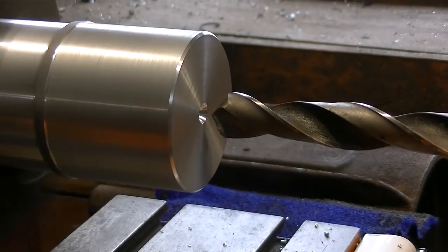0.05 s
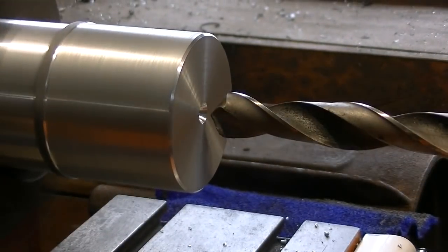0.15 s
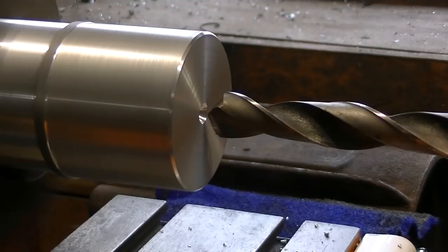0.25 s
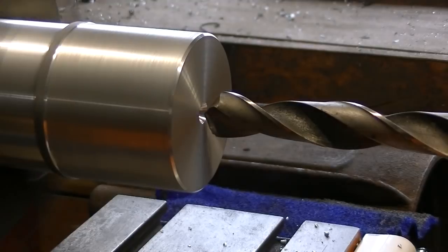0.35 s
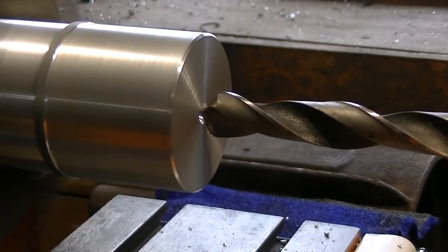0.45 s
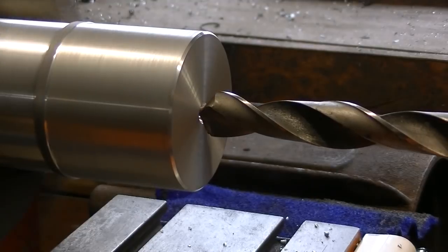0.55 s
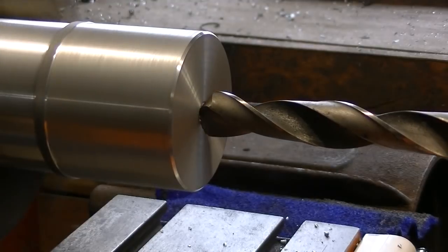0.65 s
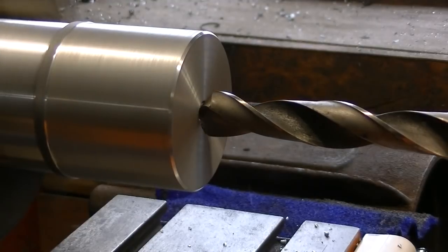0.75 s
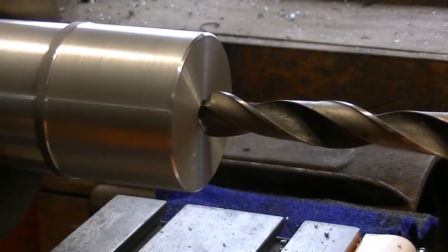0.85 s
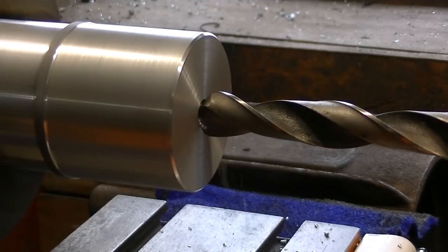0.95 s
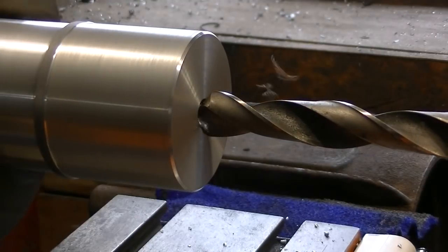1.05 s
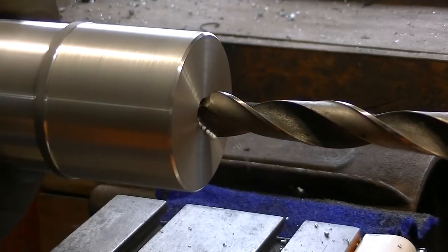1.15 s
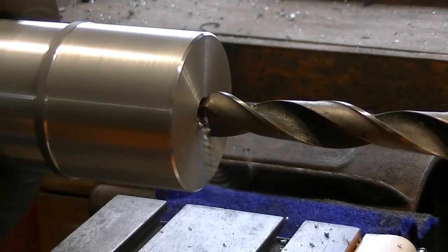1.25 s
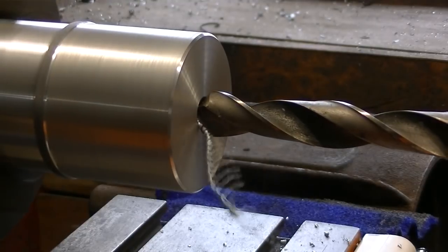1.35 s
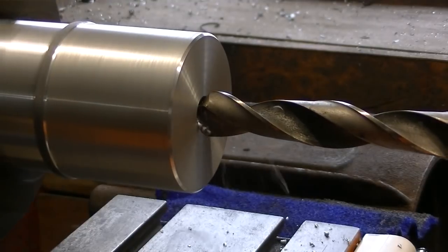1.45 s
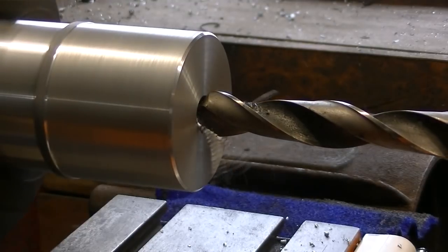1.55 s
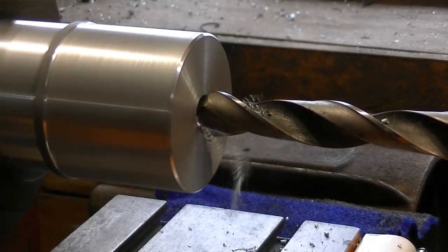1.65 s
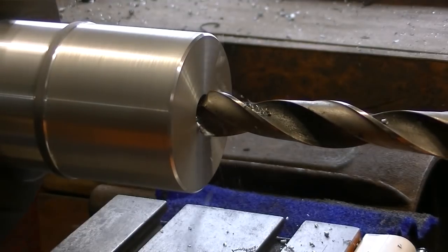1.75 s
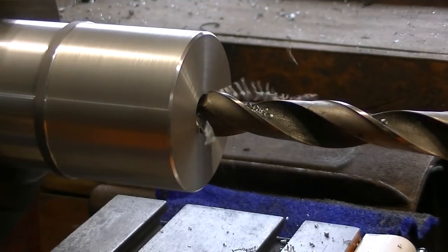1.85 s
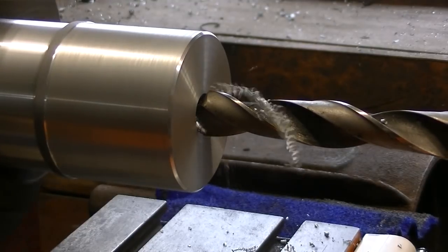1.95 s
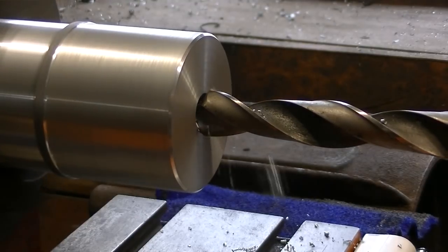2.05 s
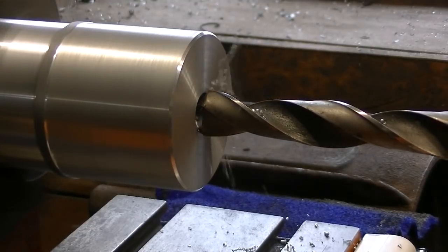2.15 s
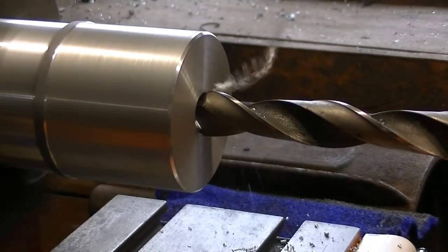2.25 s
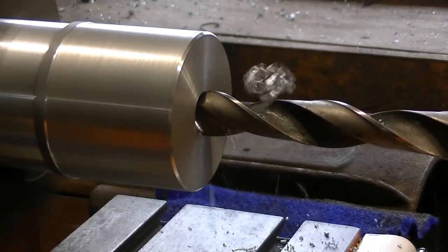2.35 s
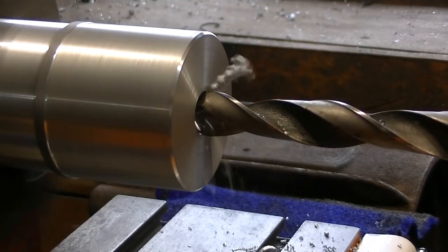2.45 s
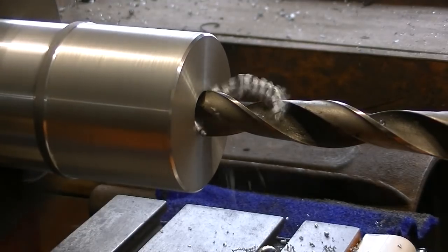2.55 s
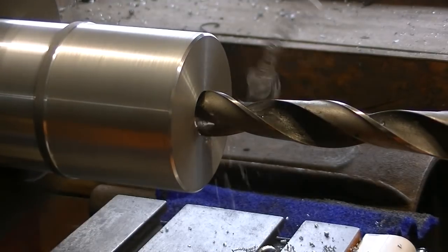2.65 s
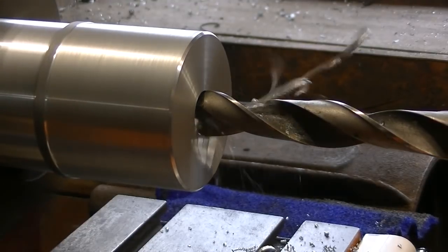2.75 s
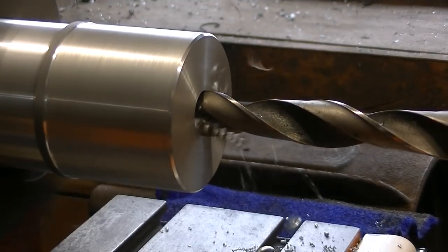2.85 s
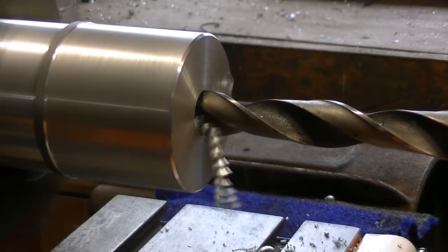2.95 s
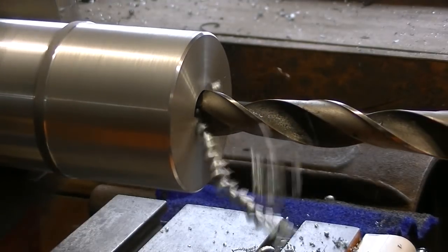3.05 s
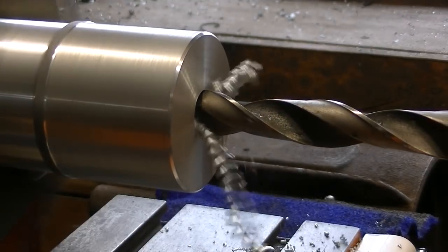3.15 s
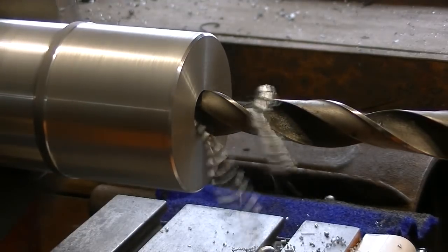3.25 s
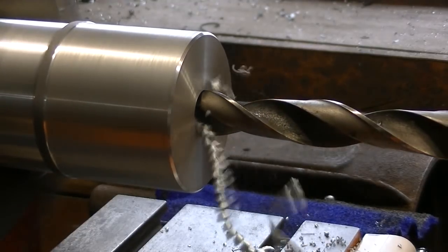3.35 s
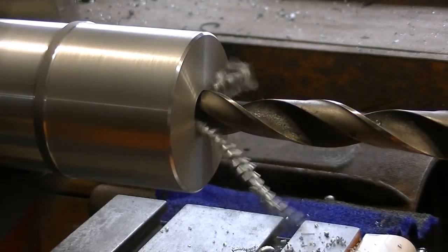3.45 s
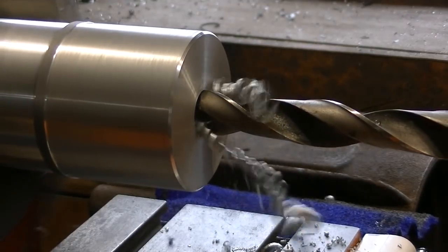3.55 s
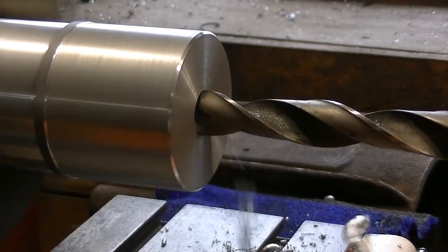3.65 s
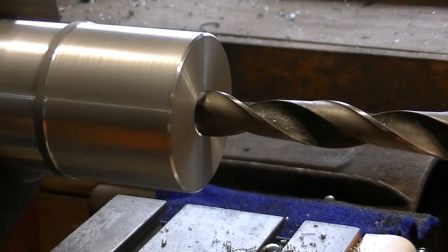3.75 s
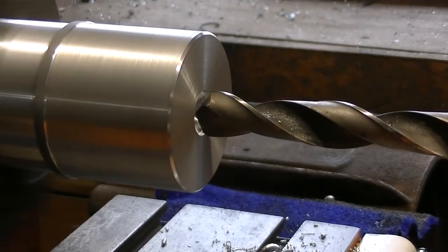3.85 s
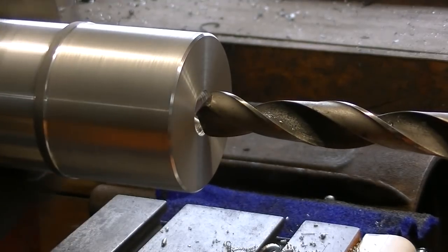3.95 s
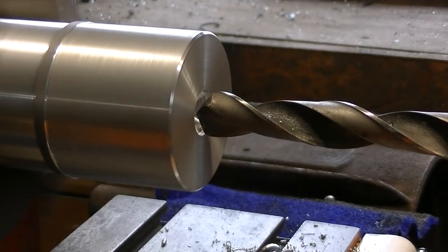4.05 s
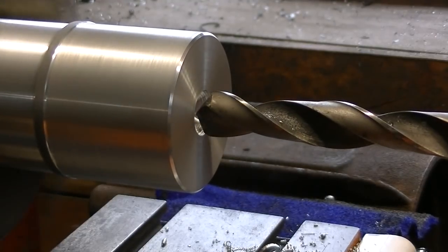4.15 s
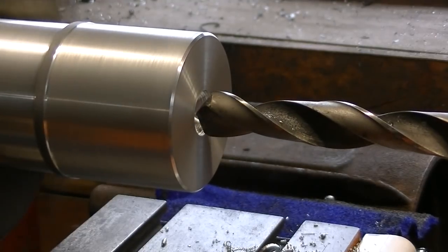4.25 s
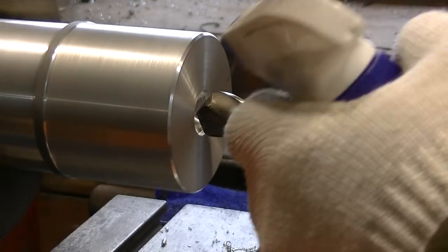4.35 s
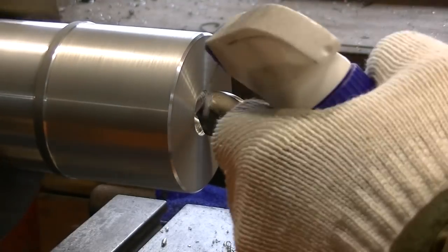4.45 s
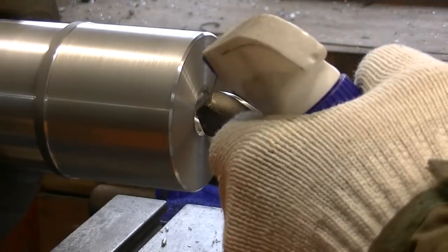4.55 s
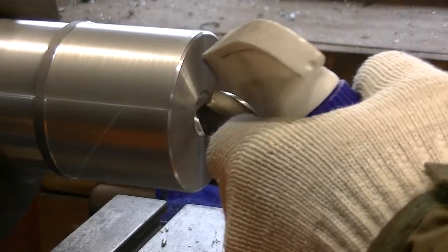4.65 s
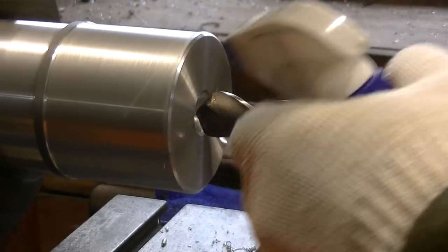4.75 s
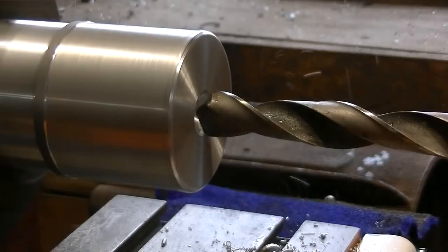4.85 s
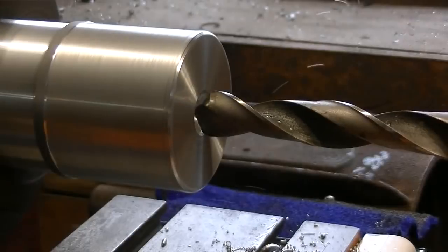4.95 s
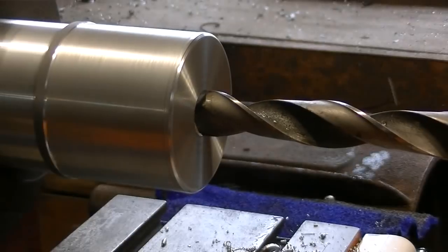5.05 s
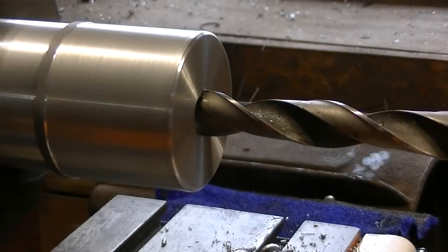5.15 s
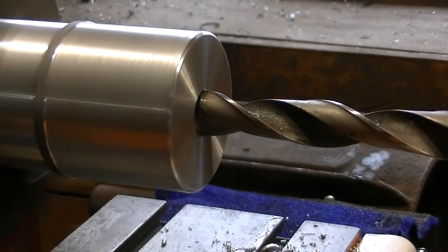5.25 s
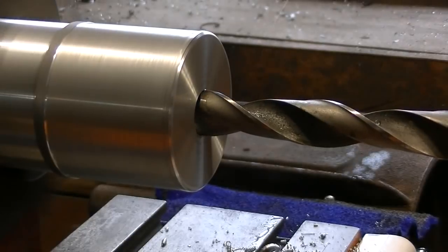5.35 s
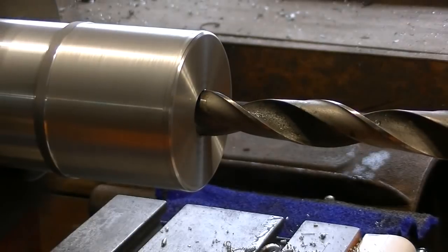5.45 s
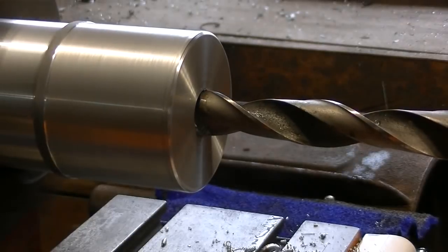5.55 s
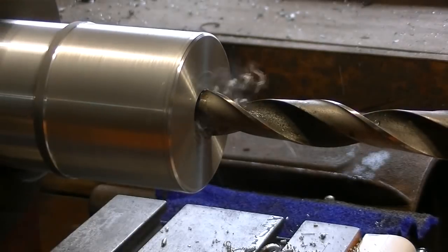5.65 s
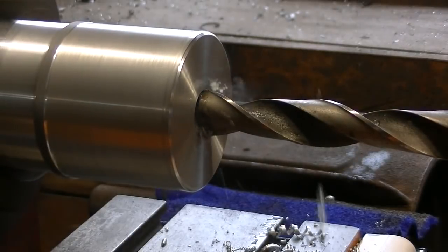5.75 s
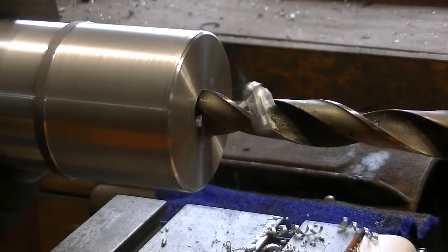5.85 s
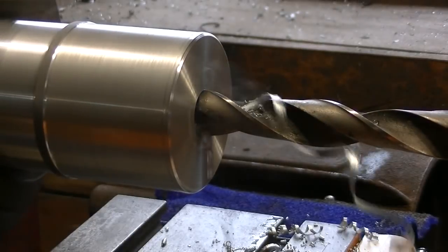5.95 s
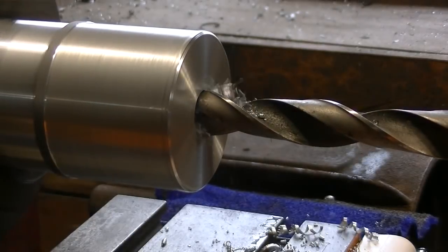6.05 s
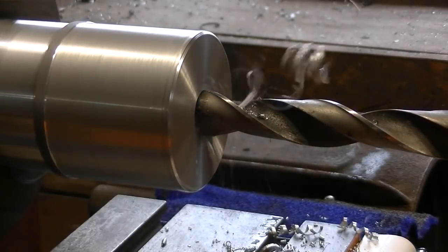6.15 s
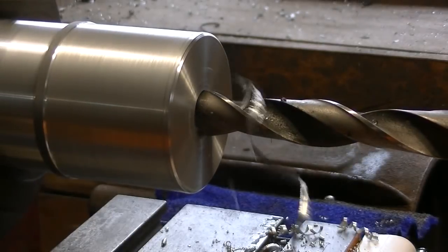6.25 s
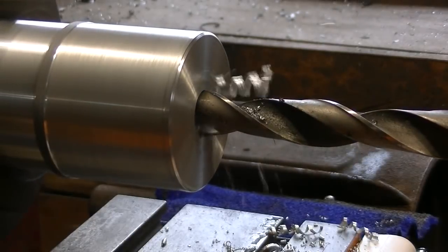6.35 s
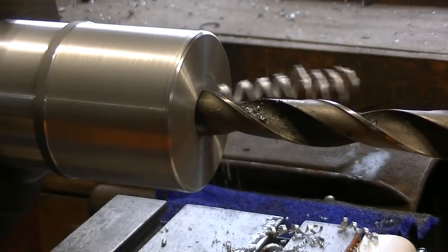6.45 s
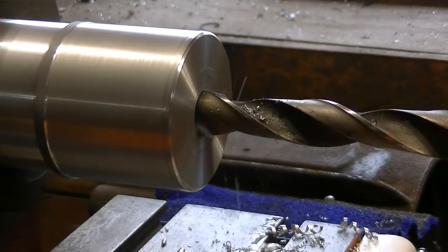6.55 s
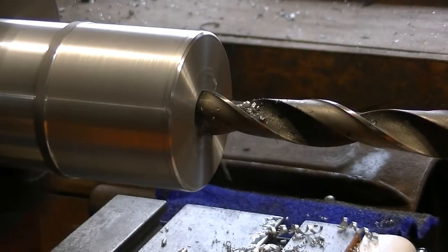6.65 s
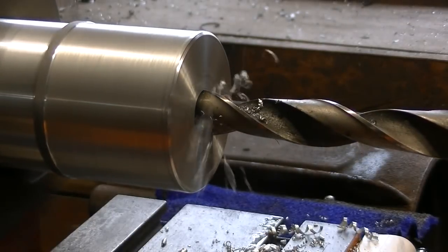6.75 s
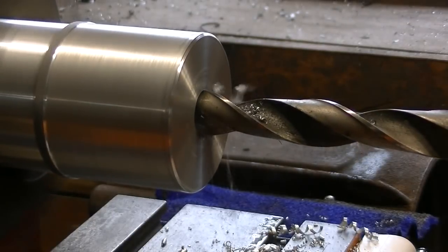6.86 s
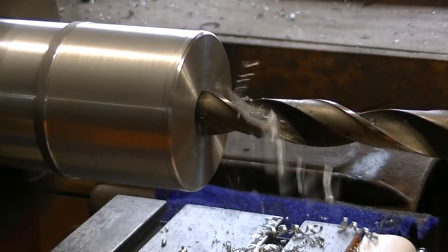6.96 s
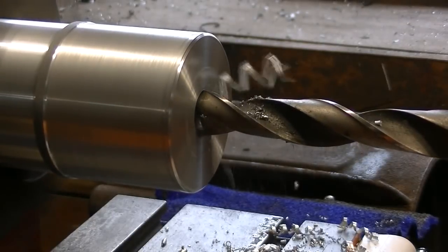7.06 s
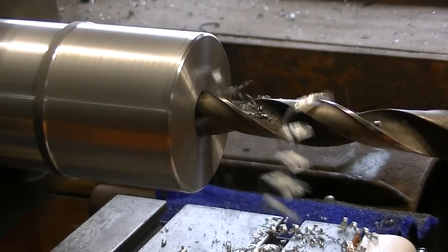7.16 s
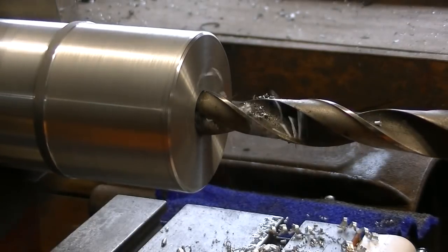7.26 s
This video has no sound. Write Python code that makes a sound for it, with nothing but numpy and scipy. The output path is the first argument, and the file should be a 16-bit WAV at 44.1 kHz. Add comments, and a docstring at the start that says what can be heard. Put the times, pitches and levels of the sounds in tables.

```python
"""In a small workshop, a large twist drill is fed into an aluminium block spinning on a lathe, backed
out briefly, and fed in again. The gears whine and the bearings hiss. The drill's cutting edges crunch
through the metal, chips groan, and short rasps come and go. The drill shakes (chatters) in a high squeal
that throbs with every turn. Near the end the whole sound sinks, with one brief swell. It is thin and
nearly mono, and a limiter turns the lathe down under the loud squeal."""
import sys
import numpy as np
from scipy import signal
from scipy.fft import rfft, irfft, next_fast_len
from scipy.io import wavfile
from scipy.ndimage import uniform_filter1d, minimum_filter1d, map_coordinates

SR = 44100
rng = np.random.default_rng(int(sys.argv[2]) if len(sys.argv) > 2 else 0)


def transcribe(u):
    """Save the signal u as a 16-bit wav file named by the first command-line argument.

    u: samples, shape (n,) or (channels, n), limited to [-1, 1]; the rate is SR.
    q: integer samples, one column per channel.
    """
    v = np.clip(np.atleast_2d(u).T, -1, 1)
    q = np.round(v * 32767).astype(np.int16)
    wavfile.write(sys.argv[1], SR, q)


N = 322371
TIME = np.arange(N) / SR
TEETH, IDLE_HZ = 71, 2365  # teeth on the gear; teeth meeting each second when idling
BITE_S, FREE_S = 0.022, 0.028  # how fast the drill bites and lets go


def amp(db):
    """Turn decibels into a gain."""
    return 10 ** (np.asarray(db) / 20)


def unit(x):
    """Scale to an average (rms) level of 1."""
    return x / np.sqrt(np.mean(np.abs(x) ** 2) + 1e-20)


def along(points, hz):
    """Read between (Hz, value) points on a log frequency axis."""
    point_hz, values = np.transpose(points)
    return np.interp(np.log(hz + 1), np.log(point_hz + 1), values)


def held(start, end, attack_s=BITE_S, release_s=FREE_S):
    """A level that rises from start, holds, and dies away after end."""
    rise = np.clip((TIME - start) / attack_s, 0, 1)
    return rise * np.exp(-np.maximum(TIME - end, 0) / release_s)


def wobble(rate):
    """A smooth random curve with rate new values a second."""
    coarse = np.arange(0, N + 8, 8)
    knots = rng.standard_normal(int(N * rate / SR) + 4)
    return np.interp(np.arange(N), coarse, map_coordinates(knots, [coarse * rate / SR]))


def phase(hz):
    """The running angle of a changing frequency."""
    return 2 * np.pi * np.cumsum(hz) / SR


def filtered(x, response):
    """Give each frequency in x the gain response(Hz)."""
    size = next_fast_len(N + 8192)
    return irfft(rfft(x, size) * response(np.fft.rfftfreq(size, 1 / SR)), size)[..., :N]


def coloured(x, spectrum, resonances=()):
    """Shape x with a smooth tone colour and ringing peaks, at level 1."""
    def response(f):
        peaks_db = sum(db / (1 + (2 * (f - hz) / width) ** 2) for hz, width, db in resonances)
        return amp(along(spectrum, f) + peaks_db)
    return unit(filtered(x, response))


def grit(spread_db, rate):
    """Grainy noise whose strength jumps rate times a second."""
    return rng.standard_normal(N) * amp(spread_db * wobble(rate))


# Each row: time in seconds, gear teeth meeting per second.
SPINDLE_SPEED = [(0, 2361), (0.4, 2371), (1.3, 2369), (1.7, 2369), (2.0, 2375), (3.58, 2373), (3.69, 2428),
                 (4.0, 2391), (4.35, 2368), (5.35, 2368), (5.55, 2354), (5.8, 2366), (6.45, 2376),
                 (6.6, 2388), (6.9, 2360), (7.31, 2382)]

def spindle():
    """The turning shaft overshoots as the drill backs out. Gives its angle and the tooth rate."""
    tooth_hz = np.interp(TIME, *np.transpose(SPINDLE_SPEED))
    return phase(tooth_hz / TEETH), tooth_hz


# The drive's quieter tones. Each row: pitch at idle in Hz, level in dB.
GEAR_TONES = [(624.5, -75), (802.1, -74), (866.7, -75), (1093, -62), (1163, -59.5), (1200, -62),
              (1244, -57), (1303, -54), (1389, -56.5), (1599, -66.5), (1707, -60.5)]

def gears(turn, tooth_hz, slide, case_hz=2350.3, case_width_hz=23.2):
    """Meeting teeth whine, louder under load; an off-centre gear makes them swell once a turn."""
    load = np.minimum(slide / amp(-25), 1) ** 2  # 1 in a full cut
    swell = (1 + 0.5 * np.cos(turn + .2 * np.cos(turn))) * amp(.7 * wobble(40))
    slack = .1 * wobble(40)
    # loudest at the pitch where the gear case rings
    strength = amp(-30 + 2.5 * load) / (1 + ((tooth_hz - case_hz) / case_width_hz) ** 2)
    whine = strength * unit(swell * np.sin(TEETH * turn + 0.46 * np.sin(turn + 1.05) + slack))
    tones = 0
    for hz, db in GEAR_TONES:
        level = np.sqrt(2) * amp(db + 0.66 + 1.93 * wobble(9))
        tones += level * np.sin(phase(hz * tooth_hz / IDLE_HZ) + 0.26 * wobble(12))
    return (whine + tones) * np.minimum(TIME / 0.014, 1)


# The bearings' tone colour. Each row: frequency in Hz, level in dB.
BEARING_COLOUR = [(480, -50), (600, -36), (790, -22), (990, -27), (1150, -4.5), (1450, -3.5), (1620, -20),
                  (2150, -1.5), (3300, -1), (4500, 3), (6400, -2), (8000, 1), (11000, -3.5), (15500, -8.5)]
# Where their housing rings. Each row: pitch in Hz, width in Hz, boost in dB.
HOUSING_RINGS = [(1268, 190, 3.2), (2349, 37, 16.8), (4081, 62, 9.2), (4244, 41, 8.7), (4822, 65, 10.2),
                 (5066, 290, 9.1), (5860, 140, 4.4), (7330, 450, 5.7), (7670, 90, 2.7), (8830, 190, 5.4)]

def bearings(level_db=-30):
    """Rolling bearings hiss and make their housing ring."""
    level = amp(level_db + 0.37 * wobble(25))
    return level * coloured(grit(spread_db=1.5, rate=500), BEARING_COLOUR, HOUSING_RINGS)


# The background's tone colour. Each row: frequency in Hz, level in dB.
BACKGROUND_COLOUR = [(25, 0), (100, -6), (500, -0.5), (15000, -7.5)]

def background(level_db=-75):
    """A very faint, steady hiss."""
    return amp(level_db) * coloured(rng.standard_normal(N), BACKGROUND_COLOUR)


# The room's echo. Each row: frequency in Hz, seconds to fade by 60 dB.
ECHO_FADE = [(300, .22), (3000, 0.067), (13000, 0.27)]

def workshop(x, level_db=-16):
    """The walls give a short, bright echo, different left and right."""
    bright = filtered(x, lambda f: amp(along([(2000, -32.5), (5000, -9.0), (12000, -3)], f)))
    hz, t, noise = signal.stft(rng.standard_normal((2, SR // 4)), SR, nperseg=256)
    tail = signal.istft(noise * amp(-60 * t / along(ECHO_FADE, hz)[:, None]), SR, nperseg=256)[1]
    tail /= np.linalg.norm(tail[0])
    return amp(level_db) * signal.fftconvolve(bright[None], tail, axes=1)[:, :N]


# The drill on the metal, from a light graze to grooves packed with chips. Each row: start and end in
# seconds, crunch in dB, its change in dB a second, hiss in dB, its change in dB a second.
CONTACTS = [(0.01, 0.68, -39, -10, -37, -13), (0.68, 1.996, -31, 3, -30.5, 4),
            (2.021, 3.605, -30.5, -5, -25.5, 5.5), (5.175, 5.464, -35, -3, -38, 3),
            (5.461, 7.31, -34, -3, -25, -5), (5.75, 6.42, -63, -3, -27, -8)]
# The edges dig in harder. Each row: start and end in seconds, crunch in dB.
SNAGS = [(0.66, 0.695, -33), (0.986, 1.27, -32), (1.197, 1.275, -34), (3.655, 3.716, -32)]

def contact():
    """How hard the edges tear and the chips slide; both drift as the drill goes deeper."""
    tear = sum(amp(db) * held(start, end) for start, end, db in SNAGS)
    slide = 0
    for start, end, crunch_db, crunch_trend, hiss_db, hiss_trend in CONTACTS:
        touch, age = held(start, end), TIME - start
        tear += touch * amp(crunch_db + crunch_trend * age)
        slide += touch * amp(hiss_db + hiss_trend * age)
    return tear, slide


def patchy(x, depth_db):
    """The tone colour keeps shifting as the chips touch in new places."""
    bands = signal.stft(x, nperseg=512)[2]
    patches = uniform_filter1d(rng.standard_normal(bands.shape), 7, axis=0)  # smooth over pitch
    patches = uniform_filter1d(patches, 22, axis=1)  # and over time
    return unit(signal.istft(bands * amp(depth_db * unit(patches)), nperseg=512)[1][:N])


# Tone colours of tearing metal and sliding chips. Each row: frequency in Hz, level in dB.
CRUNCH_COLOUR = [(480, -62), (620, -45), (820, -9), (1000, -18.5), (1150, -17), (1400, 5.5), (1700, -5),
                 (2200, 6), (3000, -2.5), (4200, 4), (5500, 5.5), (7500, 1), (10000, -5), (15500, -27)]
HISS_COLOUR = [(550, -37), (800, -32.5), (1400, -19), (2600, -21), (4200, -0.5), (5200, -17), (6000, 1.5),
               (7400, 0), (9000, 1), (11000, 2), (13000, 8), (15700, 2)]
# Where the drill rings. Each row: pitch in Hz, width in Hz, boost in dB.
DRILL_RINGS = [(3164, 23, 14), (3470, 65, 9.3), (4120, 93, 6.8), (5570, 110, 4.5), (6340, 34, 1.9),
               (6440, 47, 2.4), (6940, 120, 8.5), (7390, 200, 8.9), (8080, 110, 4.5), (8490, 350, 5.8),
               (9860, 170, 5.2)]

def cutting(turn, tear, slide, throb=0.16):
    """The edges tear the metal in tiny cracks and chips slide up the grooves; both ring the drill."""
    tearing = patchy(coloured(grit(spread_db=3, rate=1200), CRUNCH_COLOUR, DRILL_RINGS), depth_db=2)
    sliding = patchy(coloured(grit(spread_db=1.5, rate=600), HISS_COLOUR, DRILL_RINGS), depth_db=0.5)
    crunch = tear * amp(-1.5 + 1.4 * wobble(90)) * tearing
    hiss = slide * amp(-1 + 0.68 * wobble(60)) * sliding
    return (crunch + hiss) * (1 - throb * np.cos(turn))


def lathe_echoes(x, depth_db=-6, span_s=.014, count=24):
    """Quick echoes off the lathe's own parts add a metallic colour."""
    delays = (40 + rng.random(count) * span_s * SR).astype(int)
    sizes = rng.standard_normal(count)
    echoes = amp(depth_db) * np.bincount(delays, sizes / np.linalg.norm(sizes))
    return (x + signal.fftconvolve(x, echoes)[:N]) / np.sqrt(1 + amp(depth_db) ** 2)


# Single sharp ticks of metal. Each row: start in seconds, level in dB.
METAL_TICKS = [(0.6933, -27), (4.3416, -28), (4.6663, -36)]

def ticks(first_s=0.082, fade_s=.015):
    """The drill's point catches once a turn at first, ever softer; a few lone ticks follow."""
    grazes = [(first_s + age, -23 - 31 * age) for age in np.arange(7) * TEETH / IDLE_HZ]
    bursts = sum((TIME >= start) * amp(db - 60 * np.abs(TIME - start) / fade_s)
                 for start, db in grazes + METAL_TICKS)
    colour = [(600, -80), (3000, -24), (7000, 12), (15500, 8.5)]
    return amp(-4) * filtered(bursts * rng.standard_normal(N), lambda f: amp(along(colour, f)))


def rasp(hz, width_hz):
    """A narrow band of noise that sounds as a fuzzy pitch, at level 1."""
    fuzz = filtered(rng.standard_normal((2, N)), lambda f: np.exp(-f / width_hz) * (f < 750))
    return unit(fuzz[0] * np.sin(phase(hz)) + fuzz[1] * np.cos(phase(hz)))


# Each row: start and end in seconds, starting pitch in Hz, level in dB, overtones in dB above that.
CHIP_GROANS = [(0.64, 0.7, 1842, -41, -13), (0.849, 0.97, 1522, -32.5, -15),
               (0.951, 1.117, 1693, -33.5, -6), (1.12, 1.284, 1773, -34.5, 7), (1.28, 1.493, 1953, -29, -6),
               (1.529, 1.68, 2110, -33.5, -8)]

def chip_groans(curl_hz_per_s=600, rise_s=0.054, fall_s=0.034):
    """The first chips slip unevenly and groan upward as their curl tightens."""
    sound = np.zeros(N)
    for start, end, pitch_hz, db, overtones_db in CHIP_GROANS:
        hz = pitch_hz + curl_hz_per_s * np.clip(TIME - start, 0, end - start)
        overtones = .7 * rasp(2 * hz, width_hz=300) + rasp(3 * hz, width_hz=600)
        groan = rasp(hz, width_hz=152) + amp(overtones_db) * overtones
        sound += amp(db) * held(start, end, rise_s, fall_s) * groan
    return sound


# Each row: start and end in seconds, pitch in Hz, width in Hz, level in dB.
RASP_BANDS = [(0.68, 0.89, 14700, 560, -35), (0.98, 1.15, 798, 70, -55.5), (1.166, 1.24, 3480, 120, -41),
              (1.078, 1.923, 6100, 900, -34.5), (1.344, 2.6, 1409, 80, -43), (2.66, 3.013, 6110, 900, -30),
              (5.49, 5.799, 9920, 560, -32), (5.732, 6.189, 6440, 300.1, -32)]

def rasp_bands(rise_s=0.054, fall_s=0.034):
    """Short bands of fuzzy rasp; two lie about an octave below the squeal."""
    return sum(amp(db) * held(start, end, rise_s, fall_s) * rasp(np.full(N, hz), width_hz)
               for start, end, hz, width_hz, db in RASP_BANDS)


# Chatter strength in the first and second cut. Each row: time in seconds, level in dB.
FIRST_CHATTER = [(1.0, -43), (1.4, -32), (1.65, -27), (1.95, -24), (2.04, -30.5), (2.16, -19), (2.5, -13),
                 (3.5, -6.5), (3.63, -8.5), (3.75, -58)]
SECOND_CHATTER = [(5.41, -56), (5.49, -28.5), (5.61, -13), (5.68, -25), (5.78, -9), (5.92, -3),
                  (5.995, -23), (6.03, -4.5), (6.2, -7), (6.31, -19), (6.62, -25.5), (7.0, -30),
                  (7.31, -28)]
# Rough chatter's tone colour. Each row: frequency in Hz, level in dB.
ROUGH_COLOUR = [(600, -70), (2500, -33), (10500, -22), (11450, -16), (11650, 8), (11950, 4), (12400, 21.5),
                (12900, 19.5), (13300, -9), (14000, -10), (15000, -21)]
# Each row: strength table, locked pitch in Hz, once-a-turn throb (0-1), faster flutter (0-1),
# pitch scatter in Hz, time the drill backs out in seconds, low crackle in dB.
SQUEALS = [(FIRST_CHATTER, 12290, 0.51, .2, 55, 3.645, -56.5),
           (SECOND_CHATTER, 12780, 0.22, 0.489, 135, np.inf, -53)]

def squeal(turn, strength, locked_hz, throb, flutter, scatter_hz, out_s, crackle_db,
           loose_hz=13260, free_hz=14200, lock_db=-18.5, hold_s=0.055, cap_db=7):
    """The drill's chatter leaps and breaks down each turn; as it grows it drops and locks into a tone."""
    db = np.interp(TIME, *np.transpose(strength), left=-120, right=-120)
    recent_db = np.maximum(db, np.interp(TIME - hold_s, TIME, db))
    lock = 1 / (1 + np.exp((lock_db - recent_db) / 2))  # 0 is weak and rough, 1 is a clear tone
    # backing out shoots the pitch up to that of the free drill
    rise_hz = 32000 * np.maximum(TIME - out_s, 0)
    hz = np.minimum(loose_hz + lock * (locked_hz - loose_hz) + rise_hz, free_hz)
    rough_share = (0.82 * (1 - lock) + 0.21 * lock) * held(0, out_s)
    angle = turn + .35 * wobble(25)
    grip = np.tanh(3 * (np.cos(angle + .3 * np.cos(angle)) + .25))
    beats = np.cos(2 * turn + .4 * wobble(20)) + np.cos(3 * turn + .4 * wobble(20))
    swing = np.abs(1 + throb * (1 + .6 * (1 - lock)) * grip + flutter * lock * beats)
    # a strong swing holds its pitch best
    wander_hz = (scatter_hz + 330 * (1 - lock)) * wobble(450) / (.5 + .5 * swing)
    stutter = amp(2 * wobble(500))
    tone = unit(swing * stutter * np.sin(phase(hz - 45 * grip + wander_hz)))
    scream = patchy(np.sqrt(swing) * coloured(grit(spread_db=3, rate=310), ROUGH_COLOUR), depth_db=1)
    chatter = np.sqrt(1 - rough_share) * amp(1) * tone + np.sqrt(rough_share) * scream
    # friction caps the largest swings of the locked tone
    excess = lock * np.abs(signal.hilbert(chatter, next_fast_len(N))[:N]) / amp(cap_db)
    capped = chatter / (1 + excess ** 4) ** .25
    return amp(db) * (capped + lock * amp(crackle_db) * low_crackle())


def low_crackle(pops_per_s=45):
    """Low, random pops that go with the loudest squeal."""
    pops = (rng.random(N) < pops_per_s / SR) * rng.standard_normal(N)
    return coloured(pops, [(30, 4), (500, -4.5), (900, -3), (2000, -31)])


# How loud everything is near the end. Each row: time in seconds, gain in dB.
LOUDNESS = [(5.85, 0), (6.08, -10), (6.25, -11.5), (6.47, -13.5), (6.61, -1.5), (6.74, -15), (6.95, -22.5),
            (7.31, -22)]

def sinking():
    """Near the end the level sinks, with one brief swell."""
    return amp(np.interp(TIME, *np.transpose(LOUDNESS)))


def level_flutter(turn, start_s=6.66, depth=0.59, fade_s=0.26):
    """For a moment the level flutters quickly, twice a turn, then steadies."""
    spell = depth * held(start_s, start_s, release_s=fade_s)
    return 1 + spell * np.tanh(2 * np.cos(2 * turn + wobble(35)))


def scene():
    """One turning shaft sets the pace of the gears, the cut and the squeal."""
    turn, tooth_hz = spindle()
    pulsing = level_flutter(turn)
    tear, slide = contact()
    squeals = sum(squeal(turn, *row) for row in SQUEALS)
    rolling = bearings()
    cut = lathe_echoes(cutting(turn, tear, slide) + amp(-0.5) * (chip_groans() + rasp_bands()))
    metal = (rolling + cut + squeals) * pulsing + ticks()
    hiss = background()
    lathe = metal + gears(turn, tooth_hz, slide) + workshop(metal)
    return lathe * sinking() + hiss


def record(dry, ceiling_db=-6.5, hold_s=0.04, ease_s=0.0049, top_hz=15800):
    """A limiter turns everything down under the loud squeal; the highest treble is cut off."""
    needed = 1 / np.maximum(np.abs(dry).max(axis=0) / amp(ceiling_db), 1)
    lowest = minimum_filter1d(needed, int(hold_s * SR) + 1)
    gain = uniform_filter1d(lowest, int(ease_s * SR) + 1)
    return filtered(dry * gain, lambda hz: hz < top_hz)


dry = scene()
out = record(dry)
transcribe(out)
```